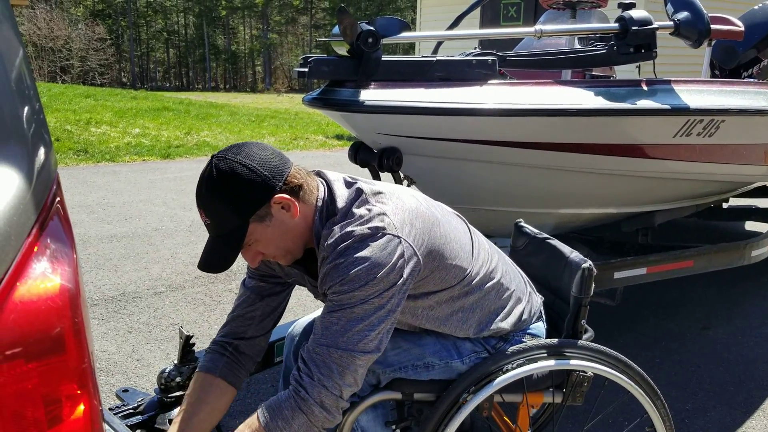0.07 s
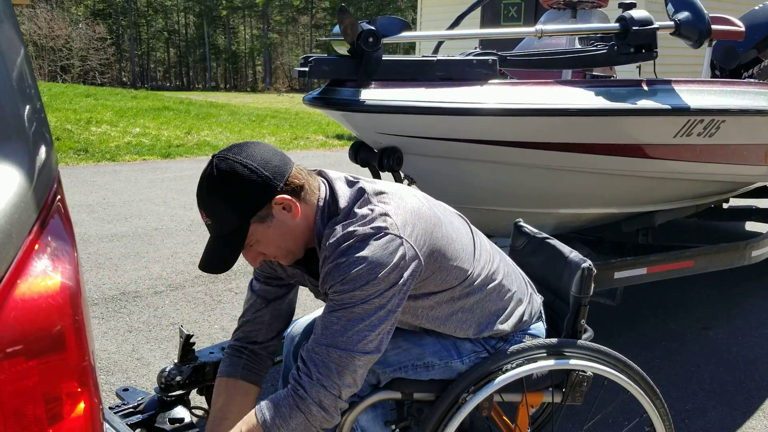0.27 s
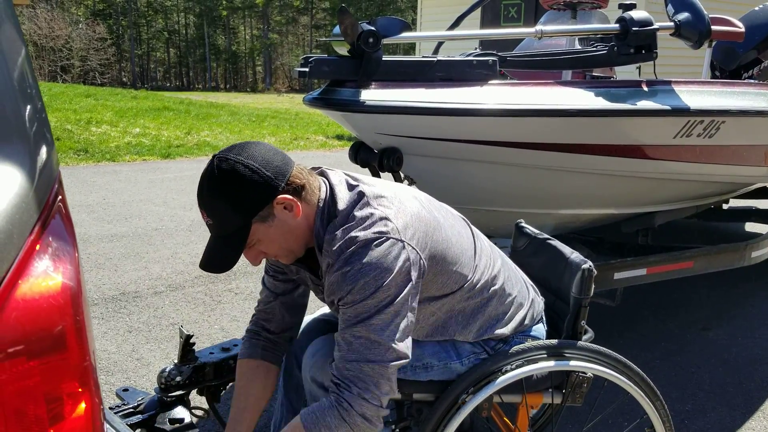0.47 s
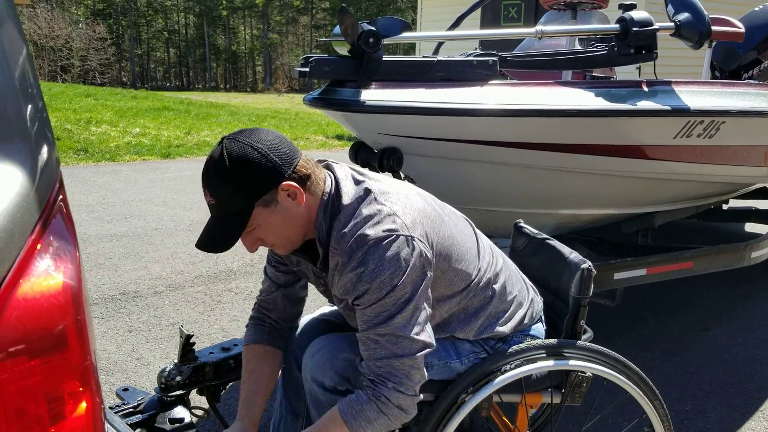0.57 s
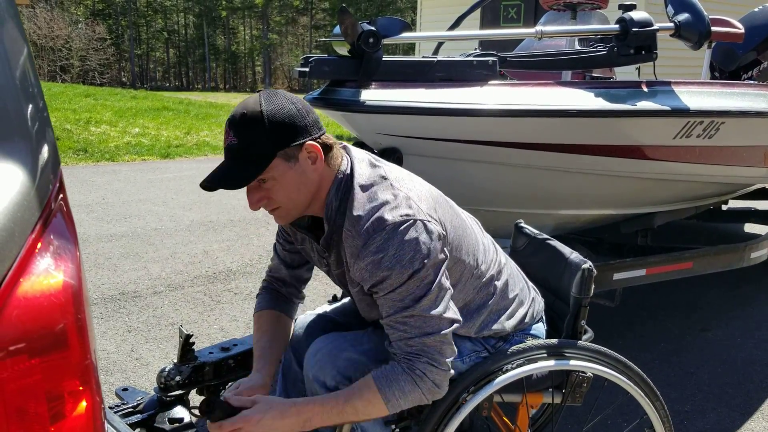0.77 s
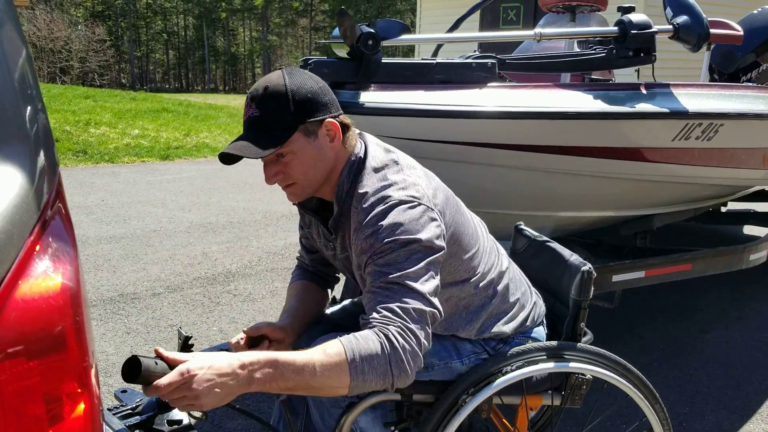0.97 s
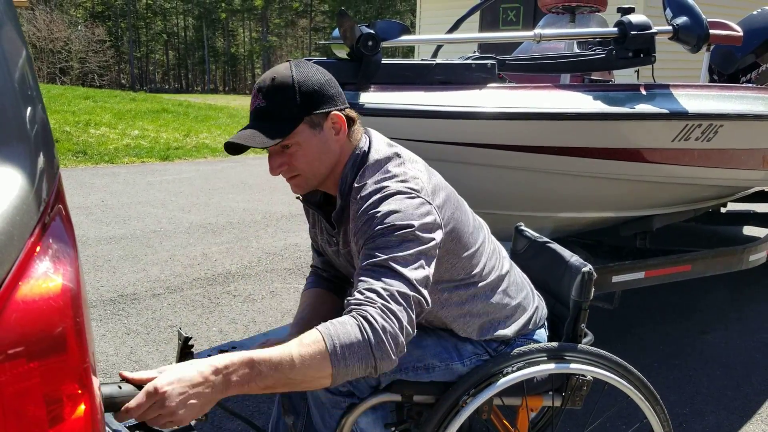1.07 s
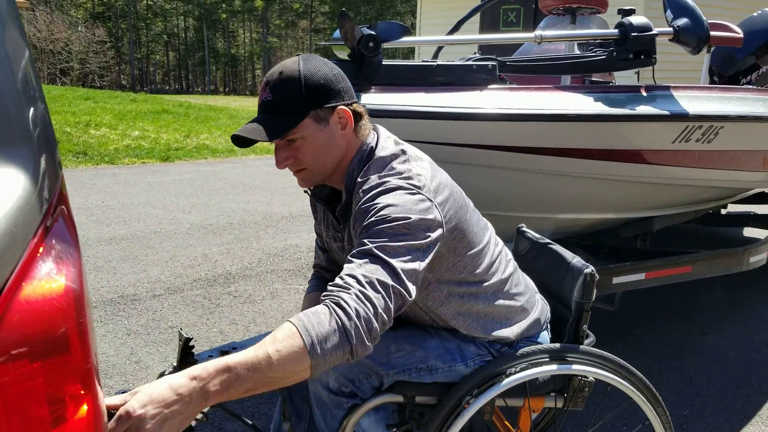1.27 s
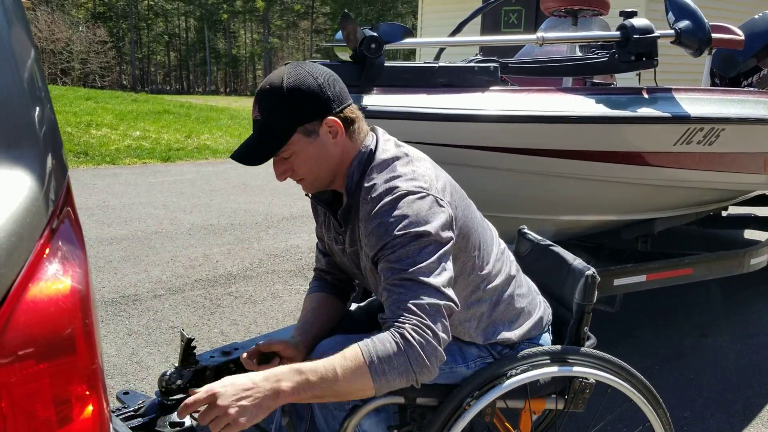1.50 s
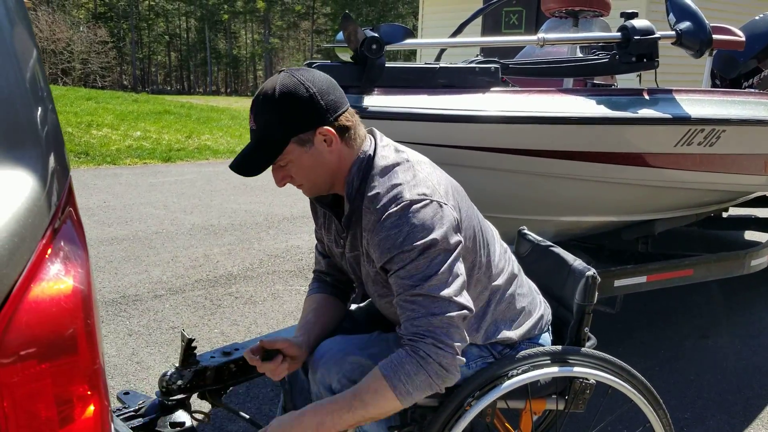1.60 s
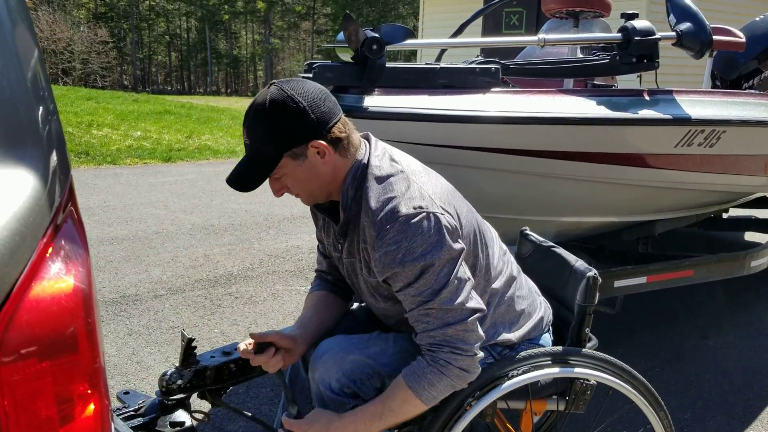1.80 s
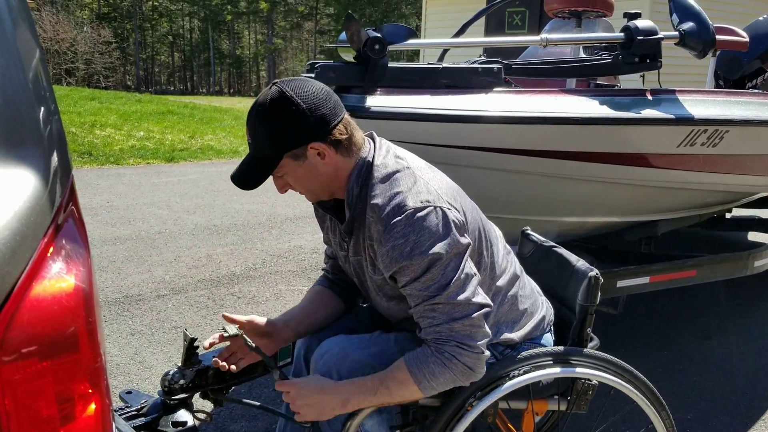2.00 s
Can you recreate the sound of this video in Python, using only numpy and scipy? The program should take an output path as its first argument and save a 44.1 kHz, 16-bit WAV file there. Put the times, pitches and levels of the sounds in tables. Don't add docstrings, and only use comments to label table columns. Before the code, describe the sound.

Close phone pickup outdoors: a bright pin click, a hard metal latch clank with short echoes, cloth rustle and faint ticks, then a flurry of hollow plastic knocks and squeaky scrapes over distant traffic.

```python
import sys
import numpy as np
from scipy import signal
from scipy.fft import rfft, irfft
from scipy.io import wavfile
from scipy.ndimage import uniform_filter1d

SR = 44100
rng = np.random.default_rng(int(sys.argv[2]) if len(sys.argv) > 2 else 0)


def persist_wave(psi):
    counts = np.round(np.clip(psi, -1, 1) * 32767).astype(np.int16)
    wavfile.write(sys.argv[1], SR, np.atleast_2d(counts).T)


def magnitude_from_level(level_db):
    exponent = np.asarray(level_db, float) / 20
    return 10 ** exponent


N = 90404


def unit(x):
    return x / np.sqrt(np.mean(x ** 2))


def read(table, hz, col=1):
    table = np.array(table, float)
    return np.interp(np.log(hz + 1), np.log(table[:, 0]), table[:, col])


def coloured(x, table):
    n = x.shape[-1]
    gain = magnitude_from_level(read(table, np.fft.rfftfreq(n, 1 / SR)))
    return irfft(rfft(x) * gain, n)


def band(x, hz, octaves):
    edges = np.clip([hz * 2 ** (-octaves / 2), hz * 2 ** (octaves / 2)], 10, .45 * SR)
    return signal.sosfilt(signal.butter(2, edges, "bandpass", fs=SR, output="sos"), x)


def high_pass(x, order, hz):
    return signal.sosfilt(signal.butter(order, hz, "high", fs=SR, output="sos"), x)


def late(x, lag_s):
    return irfft(rfft(x) * np.exp(-2j * np.pi * np.fft.rfftfreq(N, 1 / SR) * lag_s), N)


def push(times, db, contact_s):
    t = np.arange(N) / SR
    return sum(magnitude_from_level(d) * np.exp(-((t - s) / contact_s - 2) ** 2) for s, d in zip(times, db))


def ring(force, modes):
    x = 0
    for k, (hz, db, t60_s) in enumerate(modes):
        pole = np.exp(2j * np.pi * hz / SR - np.log(1000) / (t60_s * SR))
        x = x + (-1) ** k * magnitude_from_level(db) * signal.lfilter([1], [1, -pole], force).imag
    return high_pass(x, 1, 0.45 * modes[0][0])


def bursts(times, db, t60_s, loose=0.):
    t = np.arange(N) / SR
    both, left, right = rng.standard_normal((3, N))
    noise = np.sqrt(1 - loose) * both + np.sqrt(loose) * np.array([left, right])
    return noise * sum(magnitude_from_level(d - 60 * np.clip(t - s, 0, 2) / t60_s) * (t >= s) for s, d in zip(times, db))


def walk(rate_hz):
    k = int(SR / rate_hz)
    steps = np.repeat(rng.standard_normal(N // k + 1), k)
    return unit(uniform_filter1d(uniform_filter1d(steps, k), k)[:N])


def grains(rate_hz, spread_db):
    when, how_big, sign = rng.random((3, N))
    size = magnitude_from_level(-spread_db * np.log(how_big + .02))
    return unit((when < rate_hz / SR) * size * np.sign(sign - .5))


# frequency in Hz, level in dB per Hz.
AIR_SPECTRUM = [(25, -9), (72, -1.5), (190, -20), (380, -18), (560, -22), (800, -19.5), (1400, -37),
                (4000, -72.5)]
# frequency in Hz, side against middle in dB.
AIR_WIDTH = [(30, -13), (150, -15.5), (380, -7), (700, -0.5), (1300, 7.5), (2400, 0.5)]
# frequency in Hz, level in dB per Hz.
HISS_SPECTRUM = [(1180, -29.5), (2000, -15), (2900, -8), (7510, -16), (8480, -27.5), (12900, -6),
                 (16000, -4.5)]


def air():
    mid, side = coloured(rng.standard_normal((2, N)), AIR_SPECTRUM)
    side = coloured(side, AIR_WIDTH) * np.array([[1], [-1]])
    far, swell_db = 0, walk(5.6)
    for k, hz in enumerate(32 * 2. ** np.arange(8)):
        flicker_db = 1.3 * walk(14)
        far = far + (-1) ** k * magnitude_from_level(swell_db + flicker_db) * band(mid + side, hz, 1)
    engine = unit(band(rng.standard_normal(N), 56, 0.55)) * magnitude_from_level(-56.5 + 0.98 * walk(47))
    hiss = unit(coloured(rng.standard_normal((2, N)), HISS_SPECTRUM)) * magnitude_from_level(-79.5)
    return unit(far) * magnitude_from_level(-47.72) + engine + hiss


# start in s, length in s, first pitch in Hz, last pitch in Hz, level in dB.
WHISTLES = [
    (1.177, 0.12, 3480, 3390, -80),
    (1.916, 0.15, 4200, 5000, -81),
]


def bird():
    t, out = np.arange(N) / SR, 0
    for s, length_s, hz0, hz1, db in WHISTLES:
        u = np.clip((t - s) / length_s, 0, 1)
        hz = (hz0 + (hz1 - hz0) * u) * (1 + .015 * walk(340))
        tone = np.sin(2 * np.pi * np.cumsum(hz) / SR)
        out = out + magnitude_from_level(db + 4.1 * walk(46)) * np.sin(np.pi * u) ** .5 * tone
    return out


# start in s, level in dB, pitch in Hz.
TAPS = [
    (1.685, -39, 720),
    (1.848, -51, 830),
    (1.72, -46, 440),
]


def far_taps():
    return sum(magnitude_from_level(12) * band(bursts([s], [db], .07), hz, .5) for s, db, hz in TAPS)


# frequency in Hz, t60 in s, level in dB.
ECHOES = [(160, 0.54, -16), (444, 0.29, -19), (1063, 0.095, -6), (2500, 0.19, -14), (6000, 0.06, -16.5),
          (13000, 0.078, -14.5)]


def yard(x):
    t = np.arange(SR // 2) / SR
    tail = 0
    for hz, t60_s, db in ECHOES:
        tail = tail + band(rng.standard_normal((2, len(t))), hz, 1.39) * magnitude_from_level(db - 23 - 60 * t / t60_s)
    build_up = np.clip(t / 0.0077, 0, 1)
    return signal.fftconvolve(x, tail * build_up, axes=1)[:, :N]


# start in s, pitch in Hz, level in dB, left over right in dB.
GROUND_THUMPS = [
    (0.377, 82, -38.5, -2.5),
    (1.445, 59, -37, -4),
    (1.52, 62, -41, 2.5),
    (1.749, 71.8, -57.5, 34.5),
    (.19, 69.8, -45, 1),
    (1.226, 64.6, -44.5, 1),
]


def thumps():
    t, out = np.arange(N) / SR, 0
    phase, half = np.array([[.6], [-.6]]), np.array([[.5], [-.5]])
    for s, hz, db, pan_db in GROUND_THUMPS:
        u = np.clip(t - s, 0, 2) / 0.011
        tone = np.sin(2 * np.pi * hz * (t - s) + phase)
        out = out + magnitude_from_level(db + 18) * u * np.exp(-u) * tone * magnitude_from_level(pan_db * half)
    return out


# time in s, level in dB.
SLEEVE_LEVEL = [(0, -81.5), (0.167, -77), (0.198, -64), (.3, -68), (.45, -66), (0.59, -68), (.625, -62),
                (.7, -65), (.84, -68), (0.9, -73.5), (1.0, -75), (1.1, -76.5), (1.2, -73.5), (1.3, -74.5),
                (1.56, -73.5), (1.62, -84.5), (1.951, -79), (2.05, -70)]
# frequency in Hz, level in dB per Hz.
CLOTH_SPECTRUM = [(1180, -39), (2000, -5.5), (3400, -11), (3940, -6), (6530, -5.5), (9170, -8), (12700, -2),
                  (16000, -12)]


def sleeves():
    level_db = np.interp(np.arange(N) / SR, *np.array(SLEEVE_LEVEL).T)
    crackle = np.array([grains(1500, 3.3), grains(1500, 3.3)])
    x = rng.standard_normal((2, N)) + 0.56 * crackle
    return unit(coloured(x, CLOTH_SPECTRUM)) * magnitude_from_level(level_db + 2.5 + 1.2 * walk(25))


# start in s, level in dB, pitch in Hz.
SMALL_TICKS = [
    (0.6788, -48.5, 6500),
    (0.73, -48.5, 6300),
    (0.815, -50.5, 4030),
    (0.8287, -54, 10500),
    (1.1402, -44, 4130),
    (1.1747, -50, 3620),
    (1.259, -56, 3580),
    (0.999, -60, 9000),
]


def small_ticks():
    out = 0
    for s, db, hz in SMALL_TICKS:
        snap = bursts([s], [db], .025)
        out = out + magnitude_from_level(-4) * band(snap, 5900, 2.6) + band(snap, hz, .6)
    return out


# start in s, level in dB.
PIN_CONTACTS = [
    (.2157, -24),
    (.2163, -18),
    (.2169, -17),
    (.2186, -23),
    (.2290, -38),
]
# frequency in Hz, level in dB, t60 in s.
PIN_MODES = [(4210, -9, .006), (5650, -10.5, 0.007), (6730, -14, .012), (7440, -5, 0.014),
             (8184, 1, 0.0047), (8540, -3.5, 0.0099), (10760, -9, .01), (12600, -1, .01), (13500, -5, 0.01),
             (13960, -6, .012), (14680, -8, 0.01)]


def pin():
    s, db = np.array(PIN_CONTACTS).T
    snap = bursts(s, db, .009)
    out = magnitude_from_level(-3) * ring(push(s, db, .00002), PIN_MODES)
    for hz, octaves, snap_db in [(6100, 1.4, -7.5), (4400, .6, -3), (12600, .25, -3)]:
        out = out + magnitude_from_level(snap_db) * band(snap, hz, octaves)
    return out + magnitude_from_level(-22.5) * band(bursts(s, db, 0.036), 5500, 3)


# start in s, length in s, slip rate in Hz, level in dB.
CHATTER_BURSTS = [
    (1.327, 0.013, 1074, -30.5),
    (1.3515, 0.0079, 400, -29.5),
    (1.362, 0.015, 1200, -23),
    (1.408, 0.0062, 900.6, -29),
    (1.422, 0.0186, 210, -32),
    (1.457, .014, 901, -31),
    (1.469, 0.0061, 336.4, -27),
    (1.507, .016, 1286, -42.5),
    (1.532, 0.011, 840, -32.5),
]


def chatter():
    t, out = np.arange(N) / SR, 0
    for s, length_s, hz, db in CHATTER_BURSTS:
        shape = np.sin(np.pi * np.clip((t - s) / length_s, 0, 1)) ** .5
        slip = np.cumsum(hz * np.exp(.22 * walk(500))) / SR % 1 - .5
        rough = magnitude_from_level(-5) * unit(band(rng.standard_normal(N), hz, 1.18))
        out = out + magnitude_from_level(db) * (unit(band(slip, 1.05 * hz, 1.2)) + rough) * shape
    return out


# start in s, tick level in dB, thud level in dB.
PLUG_KNOCKS = [(1.304, -42.5, -41), (1.324, -29, -22), (1.331, -34.5, -22), (1.3516, -23, -30),
               (1.3649, -20.5, -25), (1.371, -24.5, -16.5), (1.4081, -27.5, -30), (1.4190, -25, -31),
               (1.425, -52, -16.5), (1.4433, -41, -42), (1.445, -26, -44), (1.45, -33, -42),
               (1.4566, -30, -38), (1.4617, -31, -42), (1.469, -69, -33), (1.5027, -29, -45),
               (1.512, -32.5, -23.5), (1.516, -36, -32), (1.5300, -30.5, -25), (1.5398, -63, -18)]
# frequency in Hz, level in dB, t60 in s.
BUMPER_MODES = [(179.6, -6, 0.095), (258.7, -7.5, 0.093), (349, 1.5, 0.07), (505, -2.5, 0.032),
                (656, 1, 0.017), (756, -1.5, 0.048), (906, 6.5, 0.016), (1026, -0.5, 0.017),
                (1290, -1, 0.016), (1620, -4, 0.0096), (1857, -9, 0.018), (2300, -9.5, 0.013),
                (2680, -13.5, 0.0076), (3000, -14, .015)]
# time in s, level in dB.
SLIDE_PRESSURE = [
    (1.291, -51.5),
    (1.329, -29.5),
    (1.343, -35),
    (1.366, -23.5),
    (1.401, -28.5),
    (1.445, -28.5),
    (1.487, -34),
    (1.535, -28),
    (1.609, -60.5),
]
# frequency in Hz, level in dB.
TICK_SPECTRUM = [(1000, 9.5), (2000, 1.5), (3500, 0), (5300, -9.5), (8050, -9), (9400, -11), (12400, -20),
                 (16000, -23)]
# start in s, level in dB.
PRONG_TOUCHES = [
    (1.446, -33.5),
    (1.456, -24),
    (1.5016, -32),
]


def plug():
    s, tick_db, thud_db = np.array(PLUG_KNOCKS).T
    press = magnitude_from_level(np.interp(np.arange(N) / SR, *np.array(SLIDE_PRESSURE).T, left=-120, right=-120))
    slide = unit(ring(grains(2000, 0.5), BUMPER_MODES)) * press * magnitude_from_level(-4.5)
    grit = unit(coloured(grains(5600, 4.8), TICK_SPECTRUM)) * press * magnitude_from_level(-20.5)
    thud = magnitude_from_level(-4.5) * push(s, thud_db, 0.00019) + magnitude_from_level(-8.5) * bursts(s, thud_db, 0.022)
    knock = magnitude_from_level(-28) * ring(thud, BUMPER_MODES)
    snap = bursts(s, tick_db, 0.022, loose=.5) + magnitude_from_level(-5.5) * bursts(s, tick_db, 0.066, loose=.5)
    click = coloured(snap, TICK_SPECTRUM)
    prongs = band(bursts(*np.array(PRONG_TOUCHES).T, 0.0227, loose=.5), 10500, 2.6)
    return slide + grit + knock + click + prongs + chatter()


# start in s, blow level in dB, rattle level in dB.
LATCH_CONTACTS = [
    (.3668, -5.5, -13),
    (.3683, -5, -10),
    (.3702, -17, -15),
    (.3712, -16, -19),
    (.3752, -17, -21),
    (.3766, -17, -21),
    (.3784, -20, -23),
]
# start in s, level in dB.
PLATE_SLAMS = [
    (.36708, -5),
    (.36724, -8),
    (.36850, -8),
    (.36865, -4),
    (.36970, -12),
    (.37140, -14),
    (.3730, -19),
    (.3753, -17),
    (.3768, -17),
    (.3785, -19),
]
# frequency in Hz, level in dB, t60 in s.
BODY_MODES = [(82, -32, 0.35), (169, -16.5, 0.44), (228, -14.5, 0.14), (291, -6.5, 0.2), (419, -3, 0.13),
              (584, -7, 0.05), (696, -9.5, 0.05), (864, -13.5, 0.1), (971, 0, 0.087), (1130, -4.5, .06),
              (1200, -11.5, .05), (1390, -8.5, 0.07), (1620, -18.5, .07)]
# frequency in Hz, level in dB, t60 in s.
STEEL_MODES = [(2035, -7.5, 0.03), (2710, -6.5, 0.033), (3360, -5, 0.052), (3560, -3, 0.051),
               (4120, -3, 0.035), (5010, -3, 0.022), (5780, -7, 0.022), (7000, -3, 0.019), (7500, -6, 0.03),
               (10200, -9, 0.03), (12800, 1.5, .025), (14800, -13, .02)]


def latch():
    s, blow_db, rattle_db = np.array(LATCH_CONTACTS).T
    slam = push(*np.array(PLATE_SLAMS).T, .00005)
    plate = magnitude_from_level(11) * signal.lfilter(*signal.iirpeak(720, 1, fs=SR), slam)
    swing = push([.3657], [-19], .0005)
    shove = band(slam, 3200, 4.2) + plate - swing
    body = magnitude_from_level(-38.5) * ring(push(s, blow_db, 0.00009), BODY_MODES)
    steel = magnitude_from_level(-33.5) * ring(bursts(s, rattle_db, 0.013, loose=.5) + magnitude_from_level(-5.5) * slam, STEEL_MODES)
    crack = band(bursts(s, rattle_db, 0.011, loose=.5), 3400, 2.5)
    sizzle = magnitude_from_level(-12) * band(bursts(s, rattle_db, 0.035, loose=.5), 12500, 1)
    tail = magnitude_from_level(-17) * band(bursts(s, rattle_db, .085, loose=.5), 2600, 2.8)
    return shove + body + steel + crack + sizzle + tail


def ports(x, lag_s, pan_db):
    t = np.arange(SR // 100) / SR
    scatter = band(rng.standard_normal((2, len(t))) * magnitude_from_level(-24 - 60 * t / .006), 5300, 3.63)
    pair = np.array([x[0] * magnitude_from_level(pan_db), late(x[1], lag_s) * magnitude_from_level(-pan_db)])
    return pair + signal.fftconvolve(pair, scatter, axes=1)[:, :N]


def scene():
    steel = pin() + latch() + small_ticks()
    plastic = plug()
    near = ports(steel, lag_s=0.00012, pan_db=1) + ports(plastic, lag_s=0.00015, pan_db=0.22)
    echoes = yard(steel + magnitude_from_level(-3.5) * plastic)
    return near + echoes + thumps() + sleeves() + air() + bird() + far_taps()


def top_cut(x):
    return signal.sosfilt(signal.butter(12, 16810, fs=SR, output="sos"), x)


def record(dry):
    x = high_pass(dry, 2, 55)
    x = x - .75 * signal.lfilter(*signal.iirpeak(9350, 7, fs=SR), x)
    x = 1.4 * np.tanh(x / 1.4)
    top = signal.ellip(8, .2, 42, 15900, fs=SR, output="sos")
    mix = signal.sosfilt(top, x)
    return top_cut(mix)


dry = scene()
out = record(dry)
persist_wave(out)
```